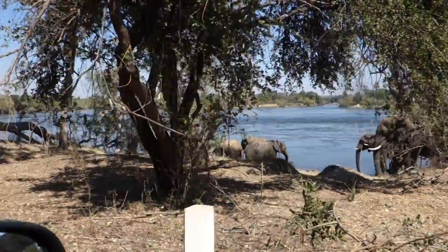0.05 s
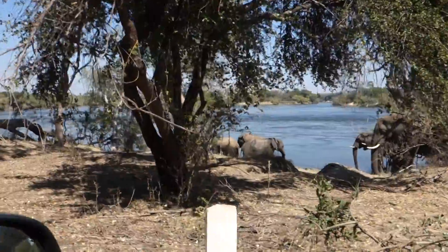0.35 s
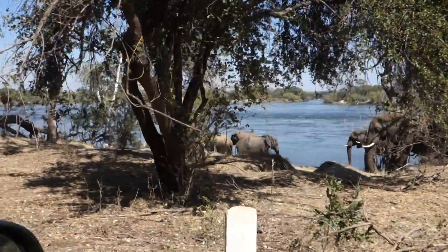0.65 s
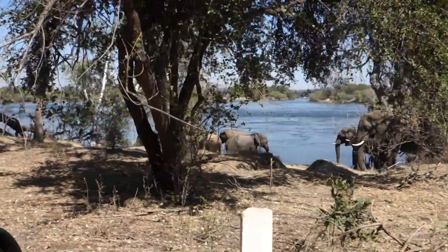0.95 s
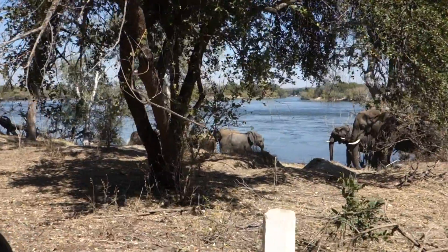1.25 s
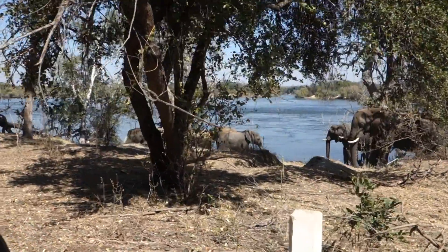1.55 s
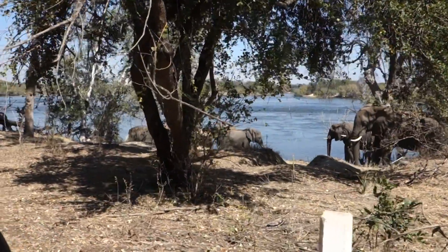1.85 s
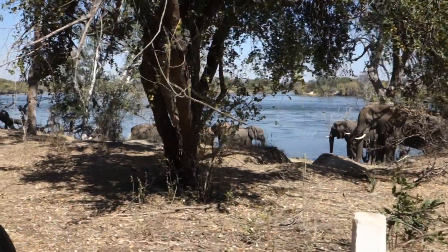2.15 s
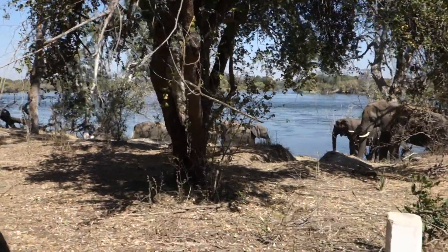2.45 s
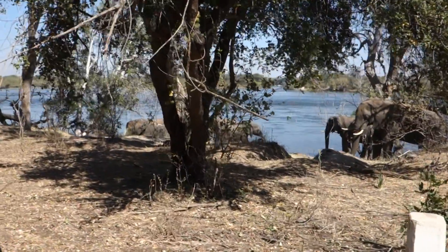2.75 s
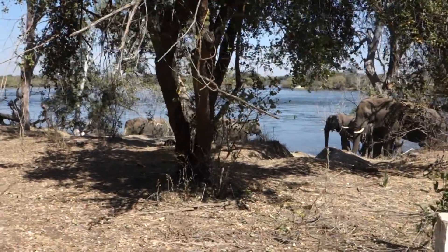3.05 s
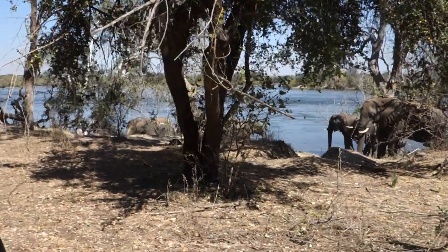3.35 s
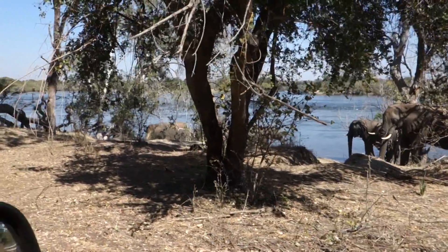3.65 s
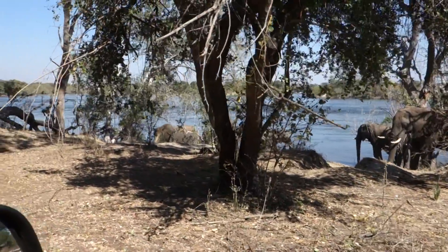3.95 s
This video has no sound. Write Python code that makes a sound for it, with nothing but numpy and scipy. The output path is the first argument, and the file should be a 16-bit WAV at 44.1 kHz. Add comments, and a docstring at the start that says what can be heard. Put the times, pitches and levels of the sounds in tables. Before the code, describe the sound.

Short, low wind gusts hit the microphone over soft tyre crunch and a few clicks.

```python
"""An open vehicle creeps along a dirt track, tyres crunching softly over a faint hiss and the camera's
thin whine. In the first second it gives a few light knocks and a breath of air stirs. Then wind buffets
the microphone in short, dull puffs that brighten as they grow stronger, some tearing into a rasp,
with gritty scuffs and a dry rustle underneath. From about 2.7 s fingers make the camera body click,
and the vehicle knocks once more while the gusts carry on."""
import sys
import numpy as np
from scipy import signal
from scipy.fft import rfft, irfft
from scipy.io import wavfile
from scipy.ndimage import uniform_filter1d

SR = 44100
rng = np.random.default_rng(int(sys.argv[2]) if len(sys.argv) > 2 else 0)


def transcribe(signal):
    """Save signal, clipped to [-1, 1], as a 16-bit WAV file at the path in sys.argv[1]."""
    frames = np.atleast_2d(signal).T
    limited = np.clip(frames, -1, 1)
    pcm = np.round(limited * 32767).astype(np.int16)
    wavfile.write(sys.argv[1], SR, pcm)


N = 176400
TIME, FREQS = np.arange(N) / SR, np.maximum(np.arange(N // 2 + 1) * SR / N, 1)
GRAIN_HZ, TYRE_PAN_DB = 190, 3


def wind():
    """Moving air hits the microphone port; the left side lags and is a little brighter."""
    phase = [(25, -1.5), (86, -0.5), (215, -0.75), (390, -1.33), (650, -1.64), (1100, -1.67)]  # left's lead over right: (frequency [Hz], phase [rad])
    balance = [(100, 0.083), (300, 1.4), (520, 2.5), (1100, 6.4)]  # left over right: (frequency [Hz], level [dB])
    port = buffeting() + breeze() + rasps()
    half = from_db(over_hz(balance) / 2) * np.exp(.5j * over_hz(phase))
    return irfft(rfft(port) * np.array([half, 1 / half]), N)


def buffeting():
    """Gusts drive eddies into the port; the mids swell faster with pressure than the bass."""
    gust_curve = [ (1.1, -92), (1.116, -45), (1.126, -34), (1.15, -28.5), (1.165, -33), (1.174, -55),
                  (1.184, -40.5), (1.2, -32), (1.212, -58), (1.225, -29.5), (1.286, -32.5), (1.298, -50),
                  (1.324, -45.5), (1.342, -31), (1.37, -44.5), (1.38, -64), (1.42, -56.5), (1.439, -40.5),
                  (1.456, -38), (1.488, -72), (1.528, -38), (1.552, -60.5), (1.586, -36), (1.6, -41.5),
                  (1.648, -39), (1.702, -68), (1.726, -33.5), (1.768, -31.5), (1.804, -46), (1.844, -65),
                  (1.858, -46.5), (1.892, -55), (1.909, -38), (1.928, -50.5), (1.979, -29), (1.99, -34.5),
                  (2.044, -39), (2.086, -36.5), (2.116, -31.5), (2.152, -30), (2.168, -39.5), (2.22, -49.5),
                  (2.24, -35.5), (2.264, -60.5), (2.34, -48.5), (2.358, -38), (2.376, -38.5), (2.394, -30),
                  (2.416, -37), (2.438, -34), (2.498, -43.5), (2.516, -37.5), (2.584, -39.5), (2.666, -36),
                  (2.686, -32), (2.708, -35.5), (2.736, -31.5), (2.768, -39.5), (2.798, -38.5),
                  (2.816, -35), (2.83, -34), (2.892, -42.5), (2.916, -32.5), (2.94, -28.5), (3.058, -39),
                  (3.074, -34), (3.096, -66), (3.108, -35), (3.12, -37.5), (3.132, -67), (3.16, -35),
                  (3.196, -41), (3.21, -60), (3.227, -33), (3.274, -50), (3.296, -34), (3.334, -58),
                  (3.386, -49), (3.4, -86), (3.41, -45.5), (3.43, -34.5), (3.494, -39), (3.51, -51),
                  (3.543, -35.5), (3.624, -44.5), (3.708, -35), (3.726, -38), (3.77, -36.5), (3.801, -26.5),
                  (3.888, -42), (3.912, -29.5), (3.966, -42), (4.0, -43.5), ]  # wind pressure: (time [s], level [dB])
    # turbulence bands: (frequency [Hz], level [dB], growth [dB per dB of pressure])
    bands = [(25, -35.5, 0), (58.3, -22.5, 0.83), (128.2, -7, 0.39), (211, -1, 0.78), (317, 0, 1.22),
             (431, -3, 1.46), (656, -19.5, 1.54), (926, -34, 1.37), (1600, -43, 0.2), (3000, -73, 1)]
    reference_db, level_db = -38, -36.5
    gusts = from_db(in_time(gust_curve)) * (TIME > gust_curve[0][0])
    pressure = np.maximum(uniform_filter1d(gusts, size=100), 1e-9) / from_db(reference_db)
    flow, out = rfft(eddies(bands)), 0
    for centre, _, growth in bands:
        band = over_hz([(row[0], row[0] == centre) for row in bands])
        out = out + from_db(level_db) * irfft(flow * band, N) * pressure ** growth
    return out


def breeze():
    """A first light stir of air ahead of the gusts."""
    envelope = [(0.44, -84), (0.484, -63), (0.53, -50.5), (0.572, -65), (0.594, -81), (0.7, -54),
                (0.76, -82)]  # wind pressure: (time [s], relative level [dB])
    colour = [(25, -37), (70, -8), (120, 0.5), (220, -8), (400, -14), (900, -56)]  # soft, bassy air: (frequency [Hz], level [dB])
    gate = (TIME > envelope[0][0]) * (TIME < envelope[-1][0])
    return from_db(in_time(envelope) + 3) * gate * eddies(colour)


def rasps():
    """A few hard gusts tear into a short rasp."""
    tears = [(1.221, 0.0056, -44.5), (1.771, 0.0067, -49), (2.153, 0.0093, -50.5), (2.726, 0.046, -47.5),
             (2.954, 0.039, -43.5), (3.79, 0.031, -41.5)]  # bursts of torn air: (middle [s], length [s], level [dB])
    colour = [(300, -40), (600, -3), (800, 0.5), (1200, -6.5), (1800, -20.5), (3000, -50), (6000, -60)]  # midrange bite: (frequency [Hz], level [dB])
    envelope = sum(from_db(db) * swell(s, length) for s, length, db in tears)
    return envelope * eddies(colour, lump_db=8)


def eddies(colour, lump_db=6.5):
    """Lumpy turbulence whose strongest eddies level off, held near rms 1 from puff to puff."""
    eddy_hz, ceiling, steady_s = 126, 1.3, 0.019
    lumps = from_db(lump_db * np.minimum(drift(eddy_hz), ceiling))
    flow = irfft(rfft(rng.standard_normal(N) * lumps) * from_db(over_hz(colour)), N)
    window = np.hanning(int(2 * steady_s * SR))
    power = signal.fftconvolve(flow ** 2, window / window.sum(), "same")
    return flow / np.sqrt(power)


def knocks():
    """The vehicle gives dull knocks at differing pitches, each with a short rattling tail."""
    # knocks: (time [s], relative level [dB], pan left [dB], pitch [ratio], brightness [Hz])
    hits = [(0.0401, -37, 2, 0.91, 2400), (.219, -42, -4, 1.6, 3470), (.225, -46, -4, 3, 3800),
            (0.3169, -28, -1, 1.04, 1900), (0.473, -35, 1, 0.86, 1190), (0.601, -36.5, 4, 1.42, 2090),
            (.872, -28, -3, 0.92, 640), (3.345, -42.5, 8, 0.85, 1400)]
    body = [(447, -6, 0.015), (823, -3, 0.012), (1296, 0.5, 0.021), (1800, -3.5, 0.019),
            (2010, -2.5, 0.016), (2460, -3, .014), (2870, -6, 0.017)]  # resonances at pitch 1: (frequency [Hz], level [dB], t60 [s])
    trim_db, low_hz = -9.5, 255
    out = np.zeros((2, N))
    for s, db, pan_db, pitch, bright_hz in hits:
        tone = signal.butter(2, [low_hz, bright_hz], "band", fs=SR, output="sos")
        modes = [(hz * pitch, mode_db, t60) for hz, mode_db, t60 in body]
        ring = strike(modes, rattle_db=-23, rattle_t60=0.11)
        add(out, s, from_db(db + trim_db) * pan(pan_db) * signal.sosfilt(tone, ring))
    return out


def handling():
    """Fingers make dry clicks in the camera body, nearer the right port."""
    clicks = [(2.681, -29, 1500, 6600), (2.7374, -38, 1800, 3300), (2.813, -26, 1300, 2800),
              (2.8657, -30.5, 700, 2600), (2.899, -38, 700, 2600), (3.048, -30, 1400, 2600),
              (3.3955, -34, 400, 3200), (3.503, -31, 4170, 7800)]  # contacts: (time [s], relative level [dB], low cut [Hz], brightness [Hz])
    shell = [(1350, -1.5, 0.0053), (2010, -5, 0.0028), (2490, -1, 0.0097), (3560, -1, 0.0046),
             (4460, 2, 0.0023), (6240, -2, 0.0029), (9100, -8, .003)]  # camera resonances: (frequency [Hz], level [dB], t60 [s])
    trim_db, pan_db, left_lag_s = -3.5, -8, 0.00015
    out = np.zeros((2, N))
    for s, db, low_hz, bright_hz in clicks:
        soft = signal.butter(3, bright_hz, fs=SR, output="sos")
        thin = signal.butter(2, low_hz, "high", fs=SR, output="sos")
        ring = strike(shell, rattle_db=-20.5, rattle_t60=0.011)
        add(out, s, from_db(db + trim_db) * signal.sosfilt(np.vstack([soft, thin]), ring))
    out[0] = np.interp(TIME - left_lag_s, TIME, out[0])
    return out * pan(pan_db)


def strike(modes, rattle_db, rattle_t60):
    """One contact and its dying rattle ring a body's modes; stereo, a quarter second."""
    t = TIME[:SR // 4]
    push = from_db(rattle_db) * rng.standard_normal((2, len(t))) * decay(t, rattle_t60)
    push[:, 0] += 1  # the contact itself
    out = 0
    for k, (hz, db, t60) in enumerate(modes):
        radius, angle = decay(1 / SR, t60), 2 * np.pi * hz / SR
        ring = signal.lfilter([1, 0, -1], [1, -2 * radius * np.cos(angle), radius ** 2], push) / 2
        out = out + (-1) ** k * from_db(db + rng.standard_normal()) * ring
    return out


def tyres():
    """Tyres roll with a steady hiss and a low rumble, crunching the grit beneath them."""
    rolling_colour = [(25, -23), (60, -34), (130, -6.5), (230, -2), (450, -4), (800, -11), (1300, -10),
                      (1600, -13), (1950, -7), (2300, -16), (3200, -17), (4800, -21.5), (6300, -18.5),
                      (9000, -22.5), (15500, -24.5)]  # rolling noise and hiss: (frequency [Hz], level [dB])
    rumble_curve = [(.35, -92), (.75, -65), (1.1, -73), (4, -72)]  # rumble swelling in: (time [s], level [dB])
    rumble_colour = [(25, -17), (100, 8), (230, 1.5), (400, -14), (1000, -44)]  # its low weight: (frequency [Hz], level [dB])
    crunch_curve = [(0, -51.5), (.1, -61), (.35, -59.5), (.55, -63.5), (1.3, -69), (1.55, -59.5),
                    (1.68, -68), (2.0, -62), (2.3, -71), (2.8, -64), (3.15, -86), (3.92, -71), (4.0, -70)]  # grit under the tread: (time [s], level [dB])
    crunch_colour = [(200, -22), (500, -7.5), (1100, -1), (2000, -1), (3000, -6.5), (5000, -17),
                     (12000, -28)]  # its sandy mids: (frequency [Hz], level [dB])
    rolling = from_db(-60.5) * stereo_noise(rolling_colour)
    rumble = from_db(in_time(rumble_curve)) * stereo_noise(rumble_colour)
    crunch = from_db(in_time(crunch_curve)) * stereo_noise(crunch_colour, grain_db=2.5)
    return rumble + (rolling + crunch) * pan(TYRE_PAN_DB)


def scuffs():
    """Short gritty scrapes, each a burst of grains around one pitch."""
    scrapes = [(1.382, .016, -56, 1600), (1.412, 0.028, -52, 1350), (1.477, .014, -62, 3770),
               (1.5, .012, -55, 1600), (1.558, 0.027, -56.5, 1410), (3.042, .004, -56, 6700),
               (3.981, 0.033, -57, 1750)]  # scrapes: (middle [s], length [s], level [dB], pitch [Hz])
    grain_db, edge_ratio = 4, 1.35
    grit = rng.standard_normal((2, N)) * from_db(grain_db * drift(GRAIN_HZ))
    out = 0
    for s, length, db, hz in scrapes:
        tone = signal.butter(3, [hz / edge_ratio, hz * edge_ratio], "band", fs=SR, output="sos")
        band = signal.sosfilt(tone, grit)
        out = out + from_db(db) * swell(s, length) * band / rms(band)
    return out * pan(TYRE_PAN_DB)


def rustle():
    """A dry, grainy rustle comes and goes on the left."""
    envelope = [(0, -93), (.4, -70), (.6, -88), (.85, -73), (1.35, -79), (1.51, -67.5), (1.68, -69.5),
                (1.8, -70), (1.85, -63), (1.92, -72), (2.45, -83), (3.08, -76), (3.105, -63.5), (3.14, -75),
                (3.46, -70), (3.7, -74.5), (4, -71.5)]  # flurries: (time [s], level [dB])
    colour = [(2000, 9.5), (4500, 10), (7000, 11.5), (11000, 6.5), (15500, -21)]  # papery treble: (frequency [Hz], level [dB])
    return from_db(in_time(envelope)) * stereo_noise(colour, grain_db=3) * pan(11)


def ticks():
    """Tiny high snaps in the rustle that die at once."""
    snaps = [(1.725, -58), (1.753, -51)]  # noise bursts: (time [s], level before the low cut [dB])
    out, t = np.zeros((2, N)), TIME[:SR // 10]
    for s, db in snaps:
        add(out, s, from_db(db) * rng.standard_normal((2, len(t))) * decay(t, t60=0.034))
    return signal.sosfilt(signal.butter(3, 7000, "high", fs=SR, output="sos"), out)


def whine(hz=15734, db=-84):
    """The camera's thin, steady tone."""
    return from_db(db) * np.sqrt(2) * np.sin(2 * np.pi * hz * TIME)


def stereo_noise(colour, grain_db=0):
    """Coloured, optionally grainy noise, centred in the bass and wide on top; rms 1."""
    likeness = [(60, 1), (290, 0.94), (640, 0.71), (1400, 0.25), (3100, 0.04), (6800, -0.093),
                (15000, 0.045)]  # stereo image: (frequency [Hz], left-right correlation [-1 to 1])
    mid, side = rfft(rng.standard_normal((2, N)) * from_db(grain_db * drift(GRAIN_HZ)))
    alike = over_hz(likeness)
    spectrum = np.sqrt(1 + alike) * mid + np.sqrt(1 - alike) * side * [[1], [-1]]
    noise = irfft(from_db(over_hz(colour)) * spectrum, N)
    return noise / rms(noise)


def drift(hz):
    """A smooth random wobble, rolled off above hz; rms 1."""
    slow = irfft(rfft(rng.standard_normal(N)) / (1 + (FREQS / hz) ** 2), N)
    return slow / rms(slow)


def swell(s, length):
    """A smooth bump around a moment."""
    return np.exp(-(2 * (TIME - s) / length) ** 2)


def decay(t, t60):
    """A tail that falls 60 dB in t60 seconds."""
    return np.exp(-np.log(1000) * t / t60)


def from_db(db):
    """Decibels to gain."""
    return 10 ** (np.asarray(db) / 20)


def rms(x):
    """Root mean square."""
    return np.sqrt(np.mean(x ** 2) + 1e-20)


def in_time(rows):
    """A level curve at every sample, held at its ends."""
    s, db = np.transpose(rows)
    return np.interp(TIME, s, db)


def over_hz(points):
    """A table joined by straight lines over log frequency."""
    hz, value = np.transpose(points)[:2]
    return np.interp(np.log(FREQS), np.log(hz), value)


def pan(db):
    """Stereo gains for a level difference; positive is left."""
    return from_db(np.array([[db], [-db]]) / 2)


def add(track, s, sound):
    """Mix a sound in at a time."""
    i = int(s * SR)
    track[:, i:i + sound.shape[1]] += sound[:, :N - i]


def scene():
    """Wind up front, over the vehicle and the camera's small noises."""
    return wind() + tyres() + rustle() + scuffs() + knocks() + handling() + ticks() + whine()


def record(dry):
    """The top is cut steeply."""
    cutoff_hz = 15950
    return irfft(rfft(dry) / np.sqrt(1 + (FREQS / cutoff_hz) ** 240), N)


dry = scene()
out = record(dry)
transcribe(out)
```